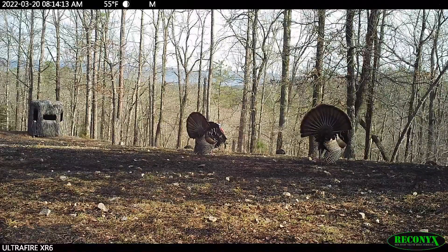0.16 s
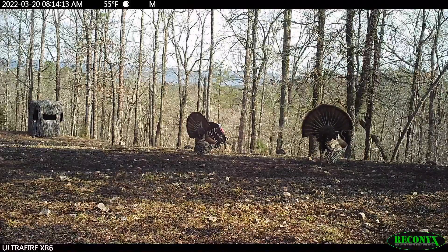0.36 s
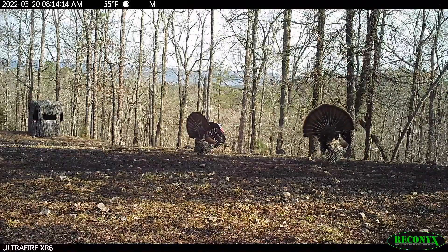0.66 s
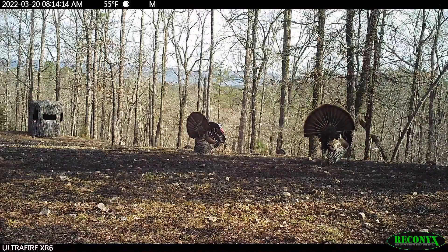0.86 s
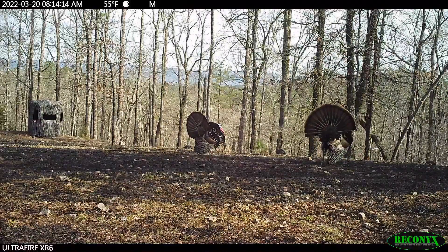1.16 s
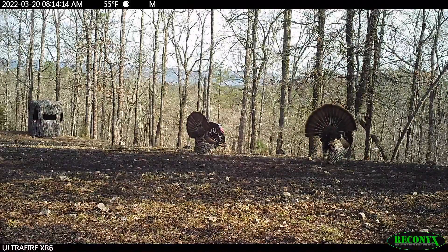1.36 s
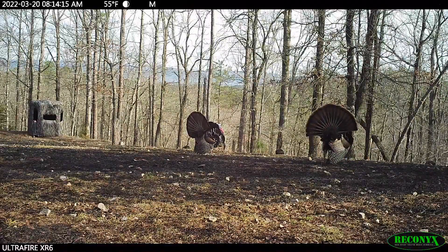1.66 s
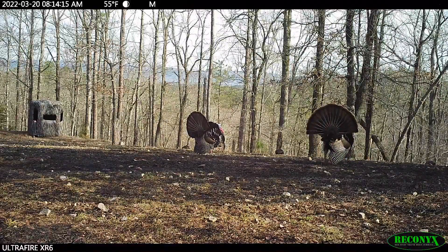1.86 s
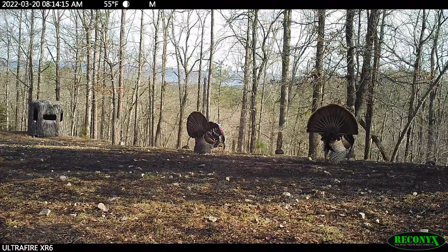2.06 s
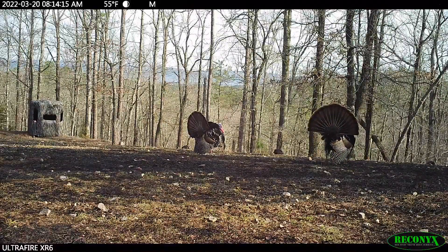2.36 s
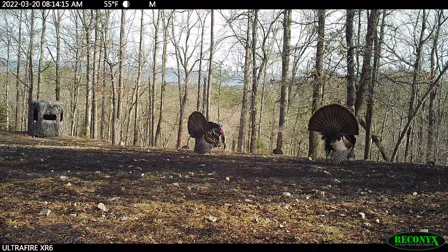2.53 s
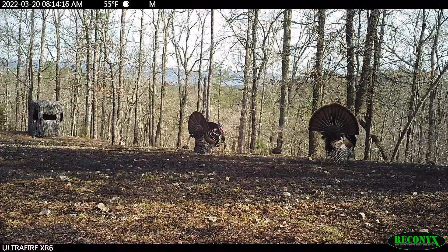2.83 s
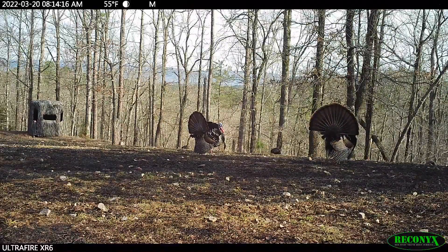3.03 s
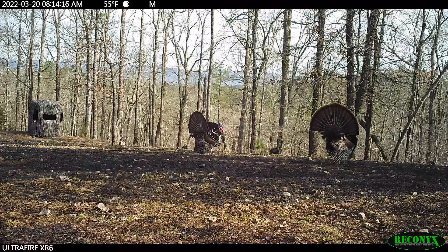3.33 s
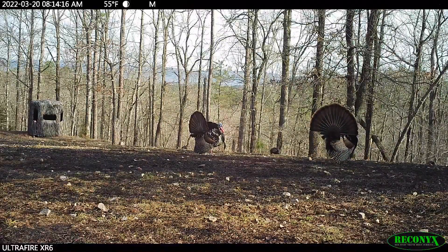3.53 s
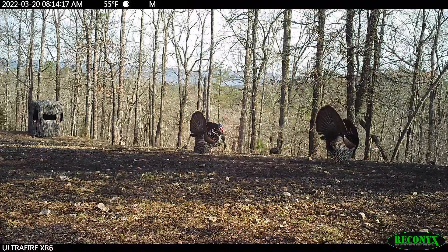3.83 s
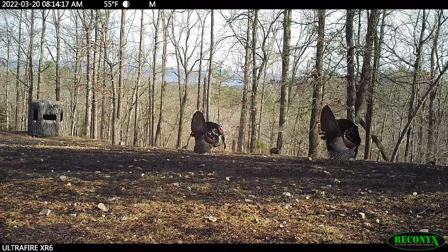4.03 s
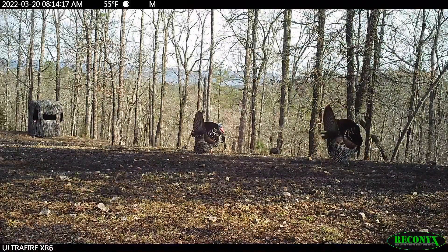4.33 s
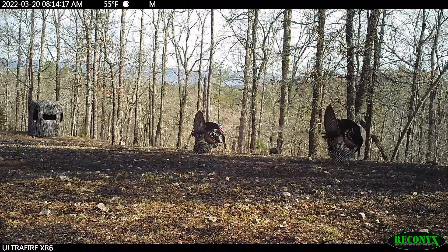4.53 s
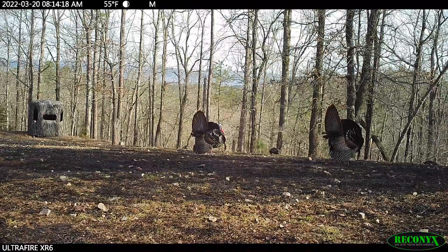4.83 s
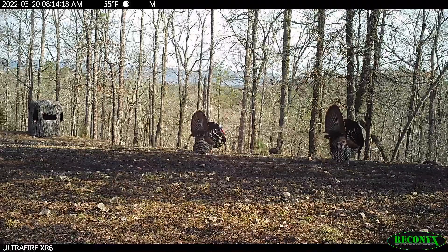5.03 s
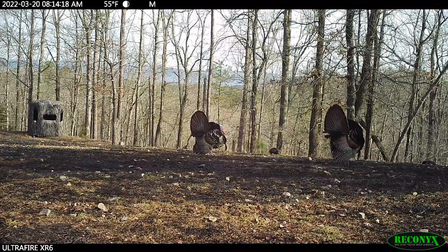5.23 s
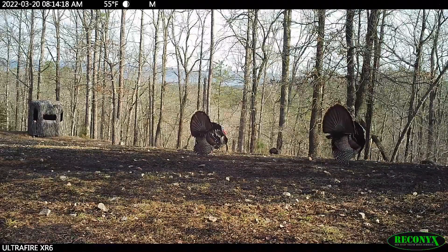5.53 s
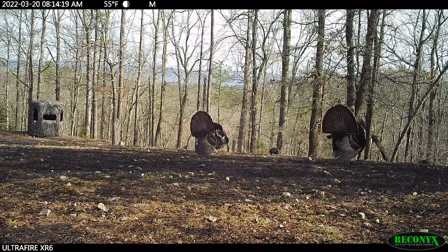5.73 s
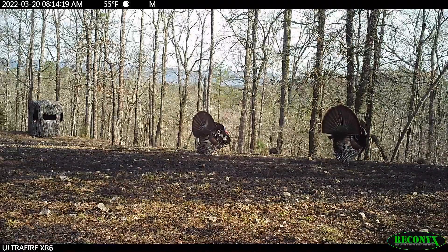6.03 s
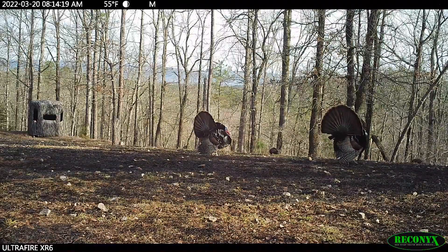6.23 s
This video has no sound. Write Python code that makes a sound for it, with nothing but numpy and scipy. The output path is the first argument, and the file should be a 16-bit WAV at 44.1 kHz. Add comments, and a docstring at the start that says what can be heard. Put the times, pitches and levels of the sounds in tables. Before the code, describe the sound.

Soft crackling turkey footsteps and small snaps in dry leaf litter, over a low air rumble, hiss and faraway bird calls.

```python
"""Two wild turkeys strut on dry leaf litter at the edge of a wood.
Feet and trailing wing tips crackle through the leaves in swells of tiny fractures; heavy steps thud
on the soil, and now and then a leaf or twig snaps and rings. Far birds call faintly among the trees,
over a low rumble of air and the steady hiss and thin electronic whine of two microphones."""
import sys
import numpy as np
from scipy import signal
from scipy.fft import rfft, irfft
from scipy.io import wavfile

SR = 44100
rng = np.random.default_rng(int(sys.argv[2]) if len(sys.argv) > 2 else 0)


def store_pcm(level_fs):
    """Save levels as 16-bit WAV."""
    pcm = np.round(np.clip(level_fs, -1, 1) * 32767).astype(np.int16)
    wavfile.write(sys.argv[1], SR, np.atleast_2d(pcm).T)


N = 281358
TIME = np.arange(N) / SR
FREQ = np.arange(N // 2 + 1) * SR / N

# footfalls: time_s, crunch_db, scuff_db, soil_weight (0-1)
FOOTFALLS = [(1.235, -53.5, -67, 0), (1.548, -48.5, -58, .7), (1.809, -54.5, -67, 0.3),
             (2.196, -52.5, -70, 0.1), (2.528, -49, -70, 0.06), (2.722, -56, -65, 0.1),
             (2.773, -49.5, -60, 1), (2.909, -50, -63, 0.1), (2.942, -53, -74, 0.1), (3.033, -48, -72, 0),
             (3.119, -57, -74, 0.05), (4.016, -45.5, -58, 0), (4.261, -57, -64, 0.1), (4.408, -58, -74, 0),
             (4.677, -58, -78, 0.2), (5.245, -58, -72, 0.14), (5.644, -48.5, -70, 0),
             (5.762, -56, -65, 0.2), (6.089, -47.5, -70, 0.15), (6.296, -49, -55.5, 0.9)]


def undb(db):
    """Decibels to gain."""
    return 10 ** (np.asarray(db) / 20)


def gains(points):
    """Gain at each FREQ from (freq_hz, gain_db) points."""
    hz, db = np.transpose(points)
    return undb(np.interp(np.log(FREQ + 1), np.log(hz), db))


def colour(x, points):
    """Minimum-phase filter of the given shape; keeps the power of white noise."""
    gain = gains(points)
    cepstrum = irfft(np.log(gain / np.sqrt(np.mean(gain ** 2))), N)
    cepstrum[1:N // 2] *= 2
    cepstrum[N // 2 + 1:] = 0
    return irfft(rfft(x) * np.exp(rfft(cepstrum)), N)


def add(track, start_s, sound):
    """Mix a short sound into the track."""
    i = int(np.clip(start_s * SR, 0, N - 1))
    track[i:i + len(sound)] += sound[:N - i]


def walk(per_s):
    """Smooth random wander, unit spread."""
    x = np.interp(TIME * per_s, np.arange(N), rng.standard_normal(N))
    return x / x.std()


def swell(peak_s, rise_s, fall_s, hold_s=0):
    """Envelope: exponential rise to 1, hold, exponential fall."""
    depth = np.maximum((peak_s - TIME) / rise_s, (TIME - peak_s - hold_s) / fall_s)
    return np.exp(-np.clip(depth, 0, 20))


def crackle(per_s, spread_db):
    """Tiny fractures: random impulses of uneven size, unit power."""
    size = undb(spread_db * np.clip(rng.standard_normal(N), -2, 2))
    x = (rng.random(N) < per_s / SR) * size * np.sign(rng.standard_normal(N))
    return x / x.std()


def air_and_hiss(gain_db=-54, bass_lean_db=0.97, flicker_db=-0.5):
    """Open air rumbles, a little to the left, and swells with the breeze; microphone hiss stays even."""
    # rumble and hiss spectrum: freq_hz, gain_db
    spectrum = [(20, -16), (35, -20), (60, -24.5), (100, -29.5), (170, -34.5), (280, -38.5), (520, -41.5),
                (1400, -45), (2300, -47.5), (4000, -49.5), (6500, -49.5), (10000, -51.5), (15000, -52)]
    # stereo width: freq_hz, side_to_mid_db
    width = [(30, -3.5), (120, -4.5), (500, -4.8), (1300, -5.3), (2600, -4), (15000, -4)]
    # rumble swells: time_s, gain_db
    breeze = [(0, -0.5), (1.9, 1.5), (2.15, 3.5), (2.45, 0), (5.7, 1), (6.3, 4.5)]
    mid, side = (rfft(colour(rng.standard_normal(N), spectrum)) for _ in range(2))
    side = side * gains(width)
    lean = undb(bass_lean_db / (1 + (FREQ / 600) ** 2))
    low_cut = FREQ / np.hypot(FREQ, 14)
    air = low_cut * np.array([(mid + side) * lean, (mid - side) / lean])
    bass = 1 / (1 + (FREQ / 110) ** 2)
    gust = undb(np.interp(TIME, *np.transpose(breeze)) + flicker_db * walk(per_s=5))
    return undb(gain_db) * (gust * irfft(air * bass, N) + irfft(air * (1 - bass), N))


def whine(drift_hz=4):
    """The electronics give off faint, slightly wandering tones."""
    # whine tones: pitch_hz, rms_db
    tones = [(9800, -90), (9860, -91)]
    track = np.zeros(N)
    for hz, db in tones:
        pitch_hz = hz + drift_hz * walk(per_s=8.9)
        track += np.sqrt(2) * undb(db) * np.sin(2 * np.pi * np.cumsum(pitch_hz) / SR)
    return track


def scatter(x, t60_s):
    """Diffuse echo from trunks and ground, different at each microphone."""
    t = TIME[:SR // 2]
    echo = rng.standard_normal((2, len(t))) * np.exp(-np.log(1000) * t / t60_s)
    echo /= np.sqrt(np.mean(np.sum(echo ** 2, axis=1)))
    return signal.fftconvolve(x[None], echo, axes=1)[:, :N]


def far_birds(note_s=.052, droop=.1, rasp_hz=42, echo_s=.058, echo_db=-8):
    """Runs of thin, hoarse notes that droop in pitch and flutter on their way through the wood."""
    # call runs: start_s, end_s, spacing_s, pitch_hz, level_db
    runs = [(0.135, 1.25, .147, 2840, -67), (4.655, 5.3, .142, 2840, -66), (0.281, .7, .292, 1430, -66)]
    track, wobble_hz = np.zeros(N), rasp_hz * walk(per_s=450)
    u = np.linspace(0, 1, int(note_s * SR))
    arch = np.sqrt(np.sin(np.pi * u).clip(0))
    for start_s, end_s, spacing_s, hz, db in runs:
        for onset_s in np.arange(start_s, end_s, spacing_s):
            progress = (onset_s - start_s) / (end_s - start_s)
            effort_db = -6 * abs(progress - .65)  # loudest just past mid-run
            pitch_hz = hz * (1 - droop * u ** 2) + wobble_hz[int(onset_s * SR):][:len(u)]
            note = undb(db + effort_db) * arch * np.sin(2 * np.pi * np.cumsum(pitch_hz) / SR)
            add(track, onset_s, note)
            add(track, onset_s + echo_s, undb(echo_db) * note)
    flutter = 1 + .35 * walk(per_s=150)
    return undb(-1) * track * flutter


def leaf_ticks(count=20, mean_db=-58, spread_db=2):
    """Further small breaks at random times; returns rows of time_s, level_db."""
    times_s = (np.arange(count) + rng.random(count)) * TIME[-1] / count
    return list(zip(times_s, mean_db - spread_db * rng.standard_normal(count)))


def snaps(leaf_db=-53.5, leaf_hz=6750, hz_per_db=51, ring_width_hz=1900, tear_s=.00057, tail_s=.0043):
    """A break tears, rings and splinters. Louder ones are stiffer twigs: higher ring, fewer splinters."""
    # leaf and twig breaks: time_s, level_db
    breaks = [(0.0959, -54), (0.3911, -60), (0.8726, -51.5), (1.2325, -54), (1.9288, -50.5), (1.9578, -49),
              (2.1364, -54), (2.2982, -48), (2.5205, -46), (2.5427, -45), (2.796, -52), (2.9732, -38),
              (3.0518, -46.5), (3.3368, -54), (4.1239, -54), (4.2568, -35.5), (4.7945, -37.5),
              (4.8418, -54), (4.918, -45.5), (4.9265, -48), (4.936, -47.5), (5.2643, -53), (5.4554, -53.5),
              (5.7365, -53), (5.7557, -36.5), (6.2326, -48.5), (6.2898, -40.5)]
    # snap spectrum: freq_hz, gain_db
    spectrum = [(300, -27), (1500, -29), (3300, -8), (4500, -12), (5500, -2), (6900, 3.5), (8000, -3),
                (9800, -4), (12500, -0.5), (15500, -21.5)]
    t = TIME[:2048] - TIME[128]  # the tear begins ahead of the break at t = 0
    after = np.maximum(t, 0)
    track, splinters = np.zeros(N), crackle(per_s=6000, spread_db=5)
    for k, (time_s, db) in enumerate(breaks + leaf_ticks()):
        ring_hz = leaf_hz + hz_per_db * (db - leaf_db)
        tail_db = -9 - .03 * (db - leaf_db)
        grains = np.roll(splinters, -k * len(t))[:len(t)]
        ring = (t >= 0) * np.exp(-np.pi * ring_width_hz * after) * np.cos(2 * np.pi * ring_hz * t)
        click = 1.05 * (ring_hz / 7000) ** 6 * (t == 0)  # harder for stiff twigs
        tear = grains * np.exp(-abs(t) / tear_s)
        tail = grains * (t > 0) * np.exp(-after / tail_s)
        parts = [(ring + click, 0), (tear, -5), (tail, tail_db)]
        snap = sum(undb(part_db) * x / np.linalg.norm(x) for x, part_db in parts)
        add(track, time_s + t[0], undb(db) * snap)
    return undb(16.5) * colour(track, spectrum)


def resonance(x, centre_hz, edge_ratio=1.375):
    """Broad band-pass, output at unit power."""
    edges_hz = [centre_hz / edge_ratio, centre_hz * edge_ratio]
    band = signal.sosfilt(signal.butter(2, edges_hz, "bandpass", fs=SR, output="sos"), x)
    return band / band.std()


def scuffs(litter_hz=1450, soil_hz=540, thud_db=-61.5):
    """A foot presses coarse grains out of the packed litter; a heavy step also thuds on the soil."""
    track, grains = np.zeros(N), crackle(per_s=4600, spread_db=2.5)
    litter, soil = resonance(grains, litter_hz), resonance(grains, soil_hz)
    for time_s, _, scuff_db, weight in FOOTFALLS:
        press = swell(time_s, rise_s=.008, fall_s=.013)
        track += press * (undb(scuff_db) * litter + weight * undb(thud_db) * soil)
    return undb(2.5) * track


def rustles(clump_db=3.5, sharp_db=-3, catch_db=3):
    """Each step or wing drag is a swell of fine, clumped leaf fractures with sparser, sharper ones."""
    # wing tips dragged through the litter: start_s, hold_s, level_db
    drags = [(1.32, 0.031, -58.5), (1.462, 0.13, -62.5), (1.909, 0.046, -57), (2.043, 0.028, -59),
             (2.145, 0.073, -59), (2.38, 0.027, -59), (2.503, .10, -55), (2.657, .27, -57.5),
             (3.035, 0.053, -58.5), (3.18, 0.17, -66.5), (3.471, 0.048, -56.5), (4.11, .07, -65),
             (6.056, 0.035, -58), (6.187, 0.25, -62)]
    # dry leaf spectrum: freq_hz, gain_db
    spectrum = [(200, -14), (1500, -12), (2800, -9), (4400, -7.5), (5600, -2.5), (6600, 0), (7800, -4),
                (9000, -13.5), (10300, -2.5), (12800, -12.5), (15500, -24.5)]
    step_power = sum((undb(db) * swell(time_s, rise_s=.0074, fall_s=.013)) ** 2
                     for time_s, db, _, _ in FOOTFALLS)
    drag_power = sum((undb(db) * swell(start_s, rise_s=.029, fall_s=.025, hold_s=hold_s)) ** 2
                     for start_s, hold_s, db in drags)
    catching = undb(catch_db * np.clip(walk(per_s=55), -1.5, 1.5))  # feathers catch and slip
    envelope = np.sqrt(step_power + drag_power * catching ** 2)
    fine = crackle(per_s=3600, spread_db=6.5) * undb(clump_db * walk(per_s=290))
    sharp = undb(sharp_db) * crackle(per_s=450, spread_db=2.5)
    return undb(-2) * colour(envelope * (fine + sharp), spectrum)


def scene(left_lag_ms=.142):
    """The turkeys are off to the right, so their sound reaches the left microphone later."""
    turkeys = rustles() + scuffs() + snaps()
    birds = far_birds()
    left = irfft(rfft(turkeys) * np.exp(-2j * np.pi * FREQ * left_lag_ms / 1000), N)
    ground = undb(-13) * scatter(turkeys, t60_s=.035)
    wood = undb(-15) * scatter(turkeys, t60_s=.6)
    far = birds + undb(-8) * scatter(birds, t60_s=.3)
    return np.array([left, turkeys]) + ground + wood + far + air_and_hiss() + whine()


def record(dry, cutoff_hz=15450, settle_s=1.1):
    """The input stage cuts the top steeply and settles slowly onto a small DC offset."""
    lowpass = signal.ellip(10, .1, 70, cutoff_hz, fs=SR, output="sos")
    offset = -.034 + .025 * np.exp(-TIME / settle_s)
    return signal.sosfilt(lowpass, dry) + offset


dry = scene()
out = record(dry)
store_pcm(out)
```